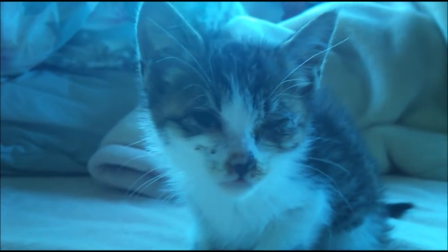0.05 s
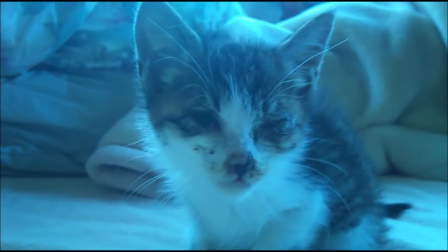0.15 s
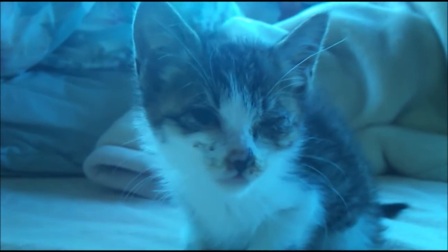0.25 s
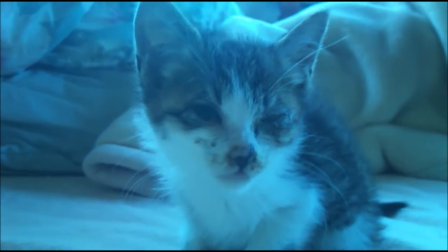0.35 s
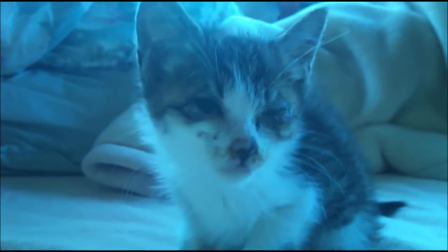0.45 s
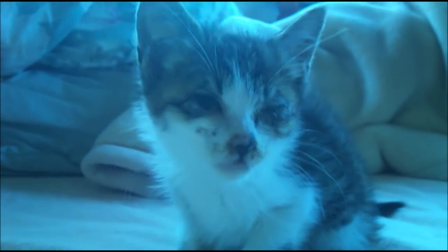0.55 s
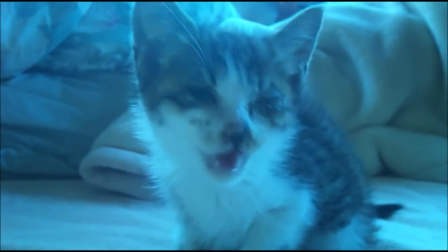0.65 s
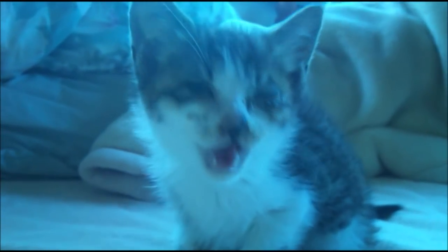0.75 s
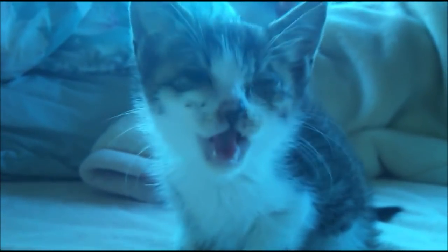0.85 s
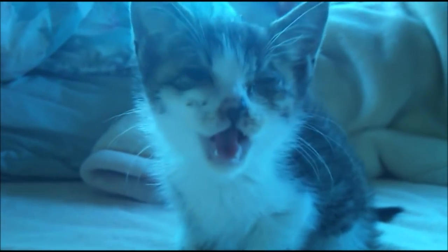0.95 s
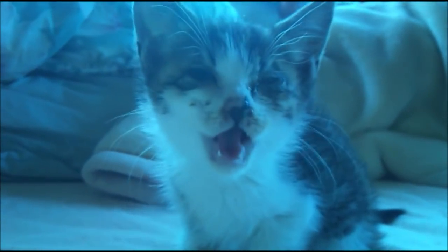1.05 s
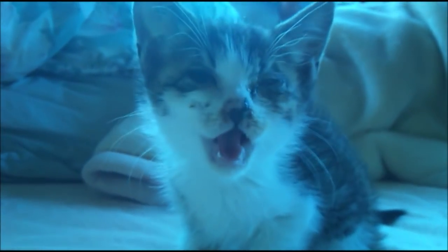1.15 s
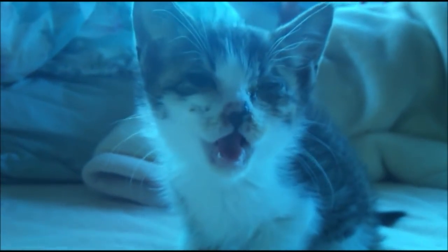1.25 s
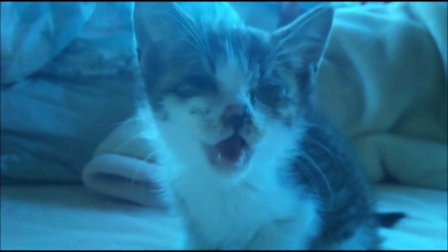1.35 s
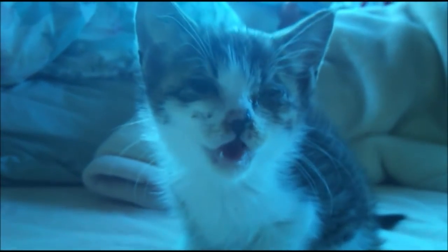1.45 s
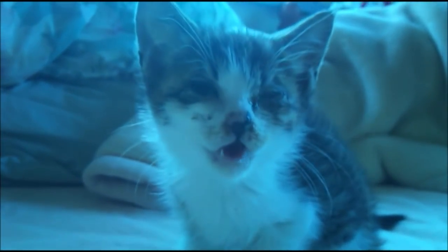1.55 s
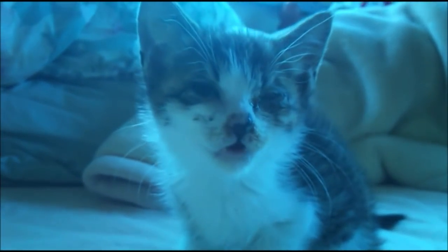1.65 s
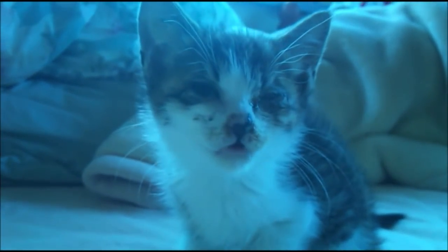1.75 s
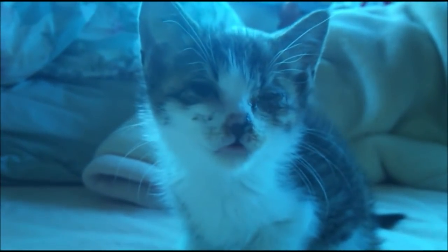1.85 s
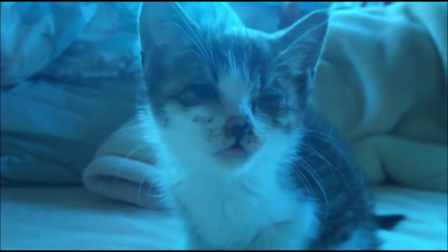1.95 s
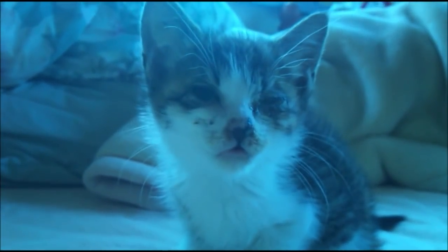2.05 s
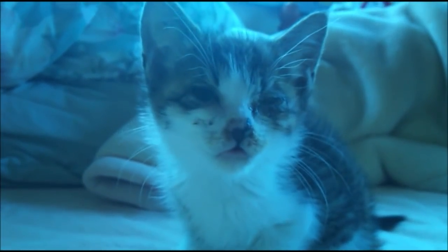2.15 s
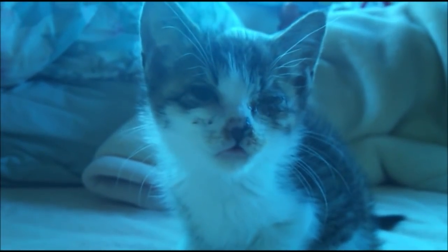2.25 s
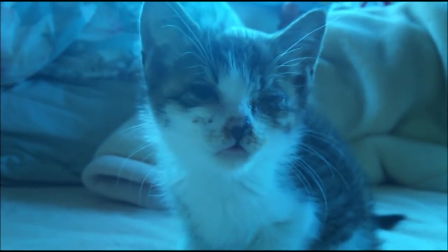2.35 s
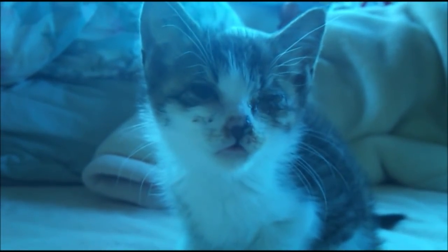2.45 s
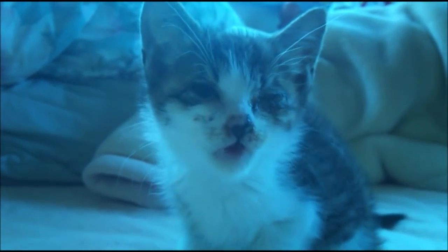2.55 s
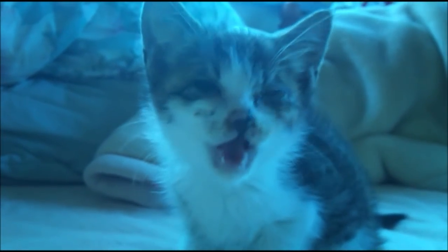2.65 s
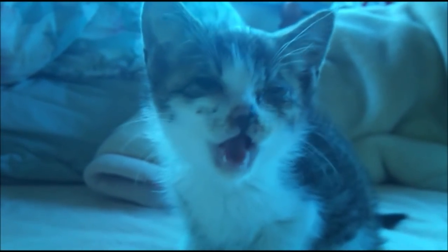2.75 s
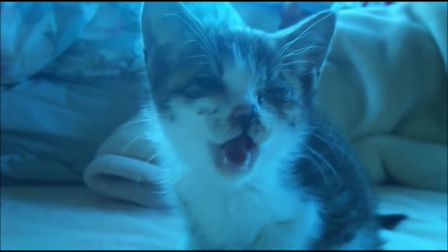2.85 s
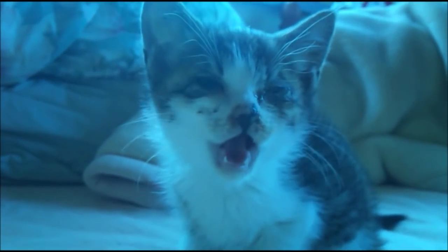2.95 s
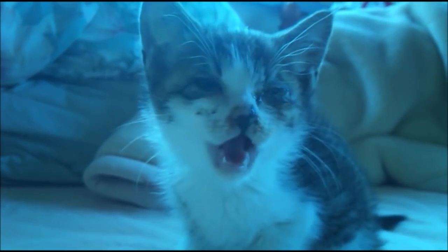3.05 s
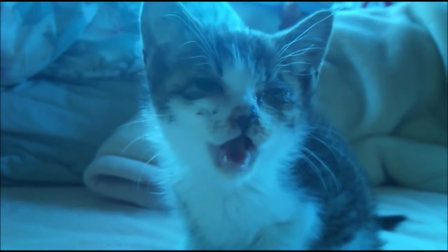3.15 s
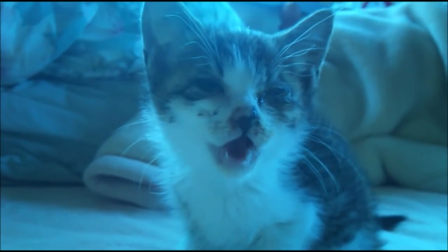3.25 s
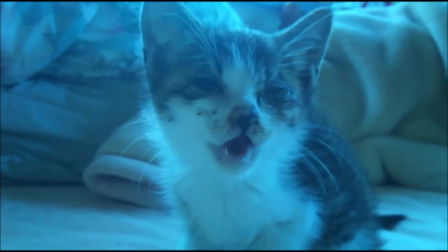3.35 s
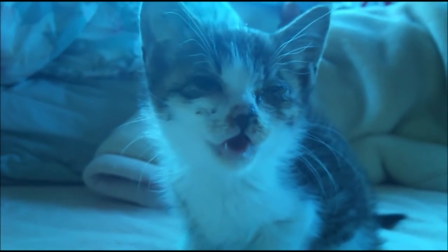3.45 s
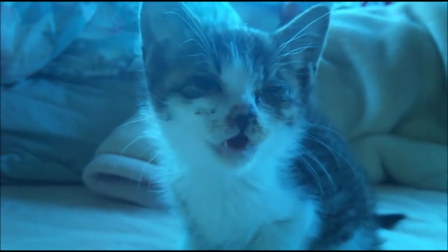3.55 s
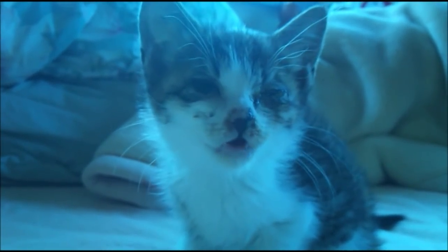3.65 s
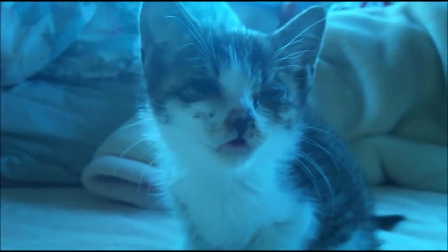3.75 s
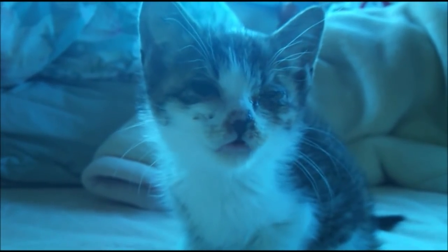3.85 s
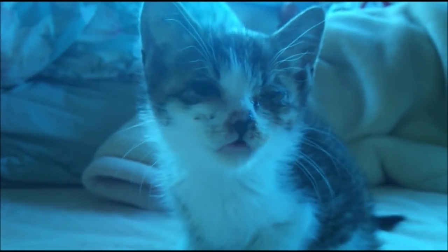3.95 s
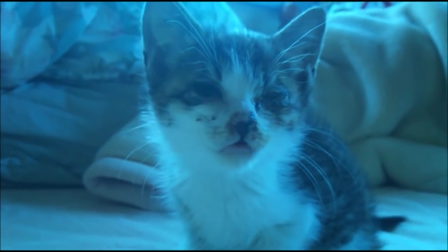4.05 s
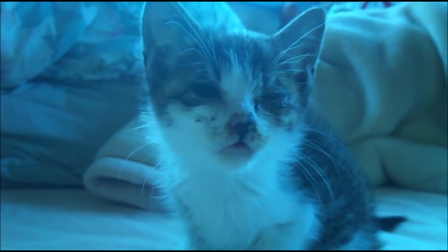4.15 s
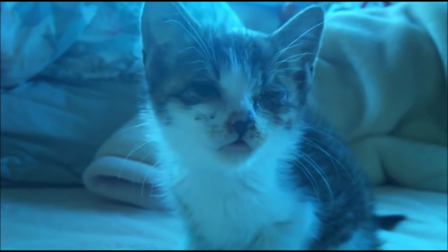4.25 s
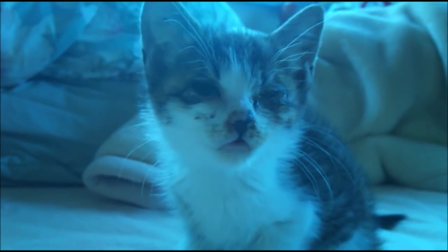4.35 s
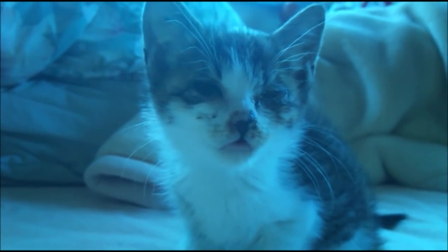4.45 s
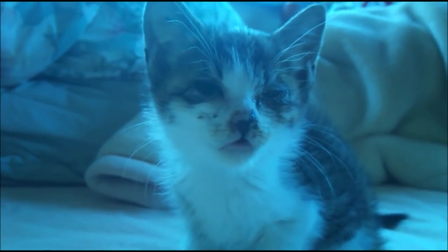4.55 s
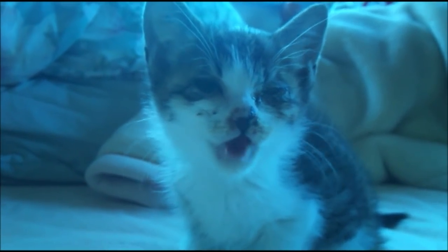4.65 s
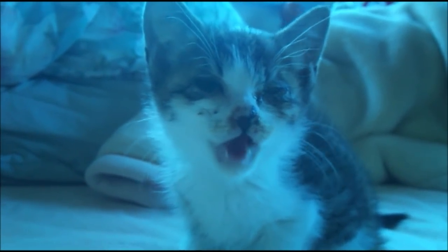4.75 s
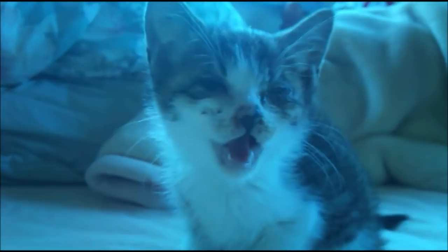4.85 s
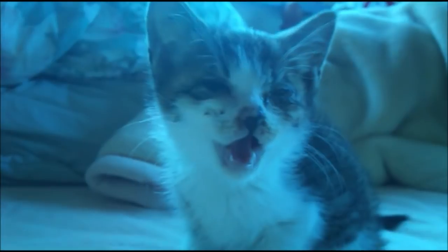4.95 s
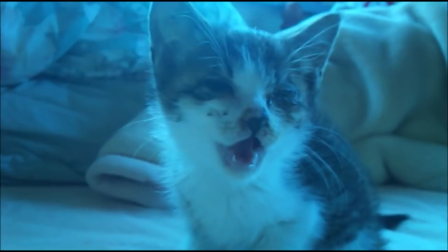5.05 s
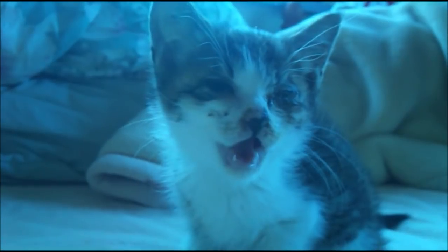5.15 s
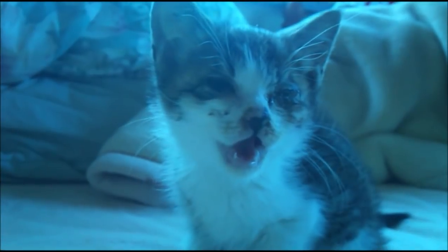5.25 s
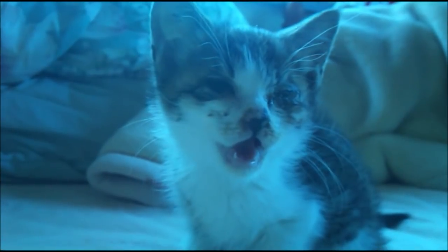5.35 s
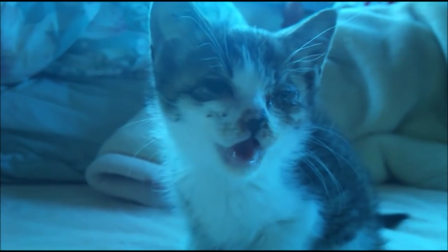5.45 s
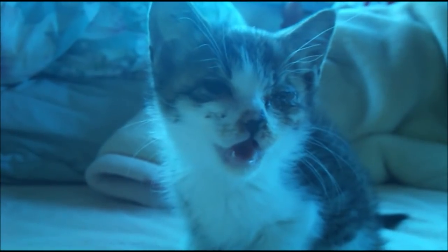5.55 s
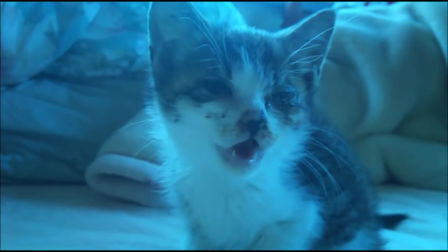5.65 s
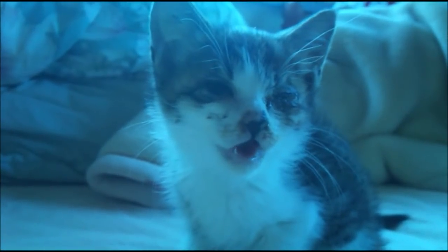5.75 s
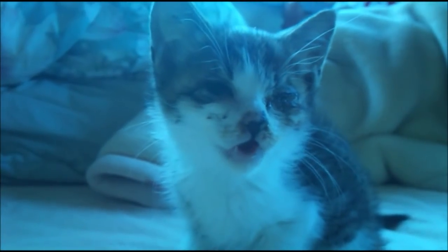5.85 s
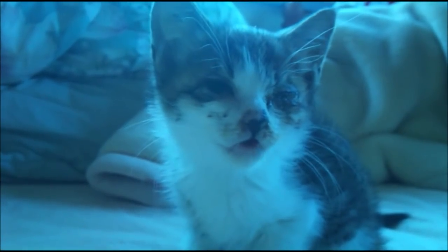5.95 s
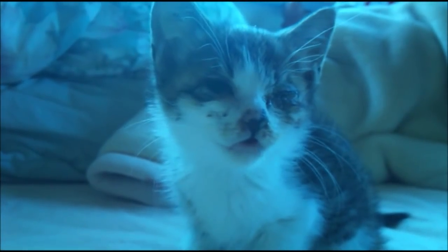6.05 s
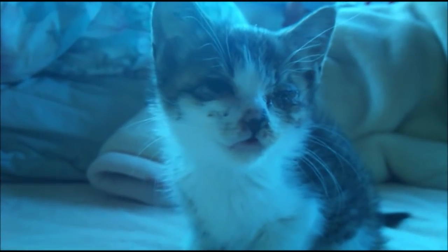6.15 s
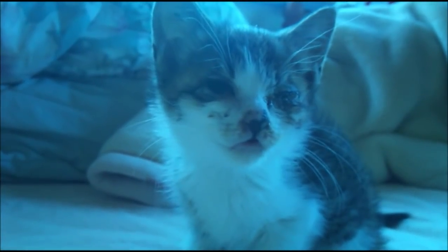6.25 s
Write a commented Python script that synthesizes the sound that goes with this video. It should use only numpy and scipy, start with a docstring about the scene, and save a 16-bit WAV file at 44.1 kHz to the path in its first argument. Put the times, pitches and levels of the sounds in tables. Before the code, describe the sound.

A tiny kitten on a bed gives three drawn-out, high, plaintive meows, recorded close with a slightly dull top end and a light room tail. The first swells gently, the second is strongest, the third softer, longer and a little raspy near its end. Every one closes with a cracking upward squeak and a small wet lip sound. Soft bedding taps appear in the second half, over very faint hiss.

```python
"""Over a faint steady hiss and low hum, a very young kitten meows three times, close by on a bed in a soft room.
Source and filter: vocal fold harmonics glide up, brighten as the mouth opens and dull as it shuts.
As each meow ends, period doubling adds half lines between the harmonics and the pitch turns up to a squeak.
Faint lip ticks and puffs, bursts of noise, follow the calls; soft taps, damped modes, come from the
second half of the scene on. Diffuse reflections tail the kitten and the taps."""
import sys
import numpy as np
from scipy import signal
from scipy.fft import rfft, irfft
from scipy.io import wavfile
from scipy.ndimage import uniform_filter1d

SR = 44100
rng = np.random.default_rng(int(sys.argv[2]) if len(sys.argv) > 2 else 0)


def bounce(signal):
    """Save signal as a 16-bit WAV file at the path given by the first command-line argument."""
    frames = np.transpose(np.atleast_2d(signal))
    limited = np.clip(frames, -1, 1)
    pcm = np.round(limited * 32767).astype(np.int16)
    wavfile.write(sys.argv[1], SR, pcm)


N = 277389
TIME = np.arange(N) / SR


def from_db(db):
    """Level to amplitude: 20 dB is a factor of ten."""
    return 10 ** (np.asarray(db) / 20)


def rms_one(x):
    """Normalisation to unit rms, the square root of mean power."""
    return x / np.sqrt(np.mean(x ** 2) + 1e-20)


def curves(rows, t):
    """Linear interpolation of each table column at times t."""
    times, *columns = np.transpose(rows)
    return [np.interp(t, times, column) for column in columns]


def drift(rate, size):
    """Low-passed chance: white noise through two equal poles at rate Hz, scaled to unit rms."""
    pole = np.exp(-2 * np.pi * rate / SR)
    settling = SR // 10
    white = rng.standard_normal(size + settling)
    return rms_one(signal.lfilter([1], [1, -2 * pole, pole * pole], white)[-size:])


def noise(spectrum):
    """Spectral shaping: white noise weighted by a colour curve over log frequency, at unit rms."""
    hz, db = np.transpose(spectrum)
    bins = np.maximum(np.arange(N // 2 + 1) * SR / N, 1)
    gains = from_db(np.interp(np.log(bins), np.log(hz), db))
    return rms_one(irfft(rfft(rng.standard_normal(N)) * gains, N))


# colour of the background hiss: (frequency [Hz], relative level [dB])
HISS_COLOUR = [(20, -3.5), (50, -3.5), (90, -3.5), (150, -2.5), (250, -3), (400, -4.5), (900, -9.5),
               (2300, -12), (4900, -15.5), (6700, -13), (7400, -23.5), (9000, -55)]


def background_hiss(level_db=-72.5):
    """Stationary noise: a constant spectrum at a constant rms level."""
    return from_db(level_db) * noise(HISS_COLOUR)


def low_hum(hz=41.8, peak_db=-81, phase_spread=0.46, drift_rate=0.82):
    """Phase modulation: a low sine whose phase (rad) wanders slowly."""
    return from_db(peak_db) * np.sin(2 * np.pi * hz * TIME + phase_spread * drift(drift_rate, N))


# vocal fold rate of each meow before the break: (time [s], pitch [Hz])
PITCH = [
    [(0.81, 526), (0.83, 513.7), (0.888, 552), (0.964, 566), (1.06, 562.2), (1.086, 554), (1.342, 554.8),
     (1.46, 568), (1.506, 554.7), (1.604, 544.6), (1.63, 547)],
    [(2.75, 423), (2.756, 427), (2.77, 464.5), (2.796, 466.5), (2.838, 526.3), (2.9, 544), (3.05, 542),
     (3.138, 544.2), (3.244, 544), (3.308, 556), (3.532, 535.7), (3.7, 567)],
    [(4.83, 475), (4.85, 512), (4.88, 502.7), (4.976, 540.2), (5.016, 537.4), (5.064, 564), (5.15, 562.6),
     (5.312, 574.6), (5.348, 562.7), (5.498, 558.8), (5.604, 546.6), (5.86, 559.8)],
]
SQUEAK_HZ = 904   # pitch the broken voice heads for


def fold_rate(number, past, t, squeak_s):
    """Register break: the fold rate follows a logistic step from the held pitch towards the squeak."""
    held_hz, = curves(PITCH[number], t)
    broken = (1 + np.tanh(past / (2 * squeak_s))) / 2
    return held_hz + (SQUEAK_HZ - held_hz) * broken


# effort of each meow: (time [s], level [dB])
EFFORT = [
    [(0.82, -50.5), (0.888, -43.5), (1.008, -40), (1.65, -50.5), (1.7, -51)],
    [(2.765, -40.5), (2.805, -38.5), (2.819, -40.5), (2.877, -35), (2.955, -34), (2.999, -37),
     (3.163, -37.5), (3.337, -45), (3.599, -50.5), (3.647, -48.5), (3.687, -54), (3.719, -50),
     (3.755, -54.5)],
    [(4.84, -50.5), (4.92, -44.5), (5.118, -44.5), (5.48, -48), (5.706, -50), (5.92, -52)],
]


def loudness(number, past, t, start, end, squeak_s, fade_s, attack_s=.028, squeak_fade_db_per_s=141):
    """Amplitude envelope: effort in dB, exponential decay from the break, linear ramps at both ends."""
    effort_db, = curves(EFFORT[number], t)
    level_db = effort_db - squeak_fade_db_per_s * np.maximum(past + squeak_s, 0)
    ramps = np.minimum((t - start) / attack_s, (end - t) / fade_s)
    return from_db(level_db) * np.clip(ramps, 0, 1)


# the jaw in each meow: (wait [s], opening [s], held wide [s], sinking to half open [s], narrowing [s])
JAW = [(0.03, 0.077, 0.32, 0.25, 0.17), (0.073, 0.046, 0.34, 0.25, 0.19), (0.038, 0.12, 0.23, 0.22, 0.35)]
# mouth shapes: (brightness [dB per octave], four throat resonances [Hz])
# one row a meow for the first shape and the widest
AJAR = [(-4.5, 1170, 2830, 3530, 4700), (-1.5, 1160, 3170, 3520, 4620), (-4, 1180, 2950, 3580, 4480)]
WIDE = [(0.22, 1264, 3027, 3474, 4710), (4.3, 880, 2715, 3237, 4060), (1.54, 967, 2940, 3280, 4580)]
# one shape each, common to all the meows, in the same columns
HALF_OPEN = (-3, 1327.5, 2895, 3490, 4598)
NARROW = (-4.5, 1122.5, 2952, 3479.5, 4204)
SHUT = (-19, 1280, 3295, 3686, 4598)


def mouth_shape(number, t, start, breaks, shut_lead_s=0.071, shut_lag_s=0.036):
    """Articulation: jaw movement shifts the resonances and spectral tilt; shutting straddles the break."""
    shutting = breaks - shut_lead_s
    jaw_times = np.minimum(start + np.cumsum(JAW[number]), shutting)
    times = [*jaw_times, shutting, breaks + shut_lag_s]
    ajar, wide = AJAR[number], WIDE[number]
    shapes = [ajar, wide, wide, HALF_OPEN, NARROW, NARROW, SHUT]
    return curves(np.column_stack([times, shapes]), t)


# brief catches in the throat: (time [s], half length [s], added roughness [0-1])
CATCHES = [(1.094, .02, 0.03), (1.396, 0.021, .11), (2.821, .01, 0.1), (2.968, .022, 0.01),
           (5.719, 0.018, 0.26), (5.801, 0.032, 0.31)]


def hoarseness(t, start, breaks, settle_s, held_rough, break_rough, onset_rough=.75, break_rough_s=0.044):
    """Irregular phonation: rough at onset, decaying to a held value, catching, rough again at the break."""
    onset = onset_rough * np.exp(-(t - start) / settle_s)
    ending = break_rough * np.exp(-(np.minimum(t - breaks, 0) / break_rough_s) ** 2)
    catches = sum(depth * np.exp(-((t - s) / half) ** 2) for s, half, depth in CATCHES)
    return np.clip(held_rough + onset + ending + catches, 0, 1)


def period_doubling(past, strength, fade_s, lead_s=0.067, growth_s=0.035, lag_s=0.0076):
    """Subharmonic bifurcation: alternate cycles differ exponentially more in a short span about the break."""
    span = np.clip(np.minimum(past + lead_s, lag_s - past) / fade_s, 0, 1)
    return strength * np.exp(past / growth_s) * span


def resonance(hz, centre, width):
    """Second-order resonance: complex response of one throat mode."""
    return 1 / (1 - (hz / centre) ** 2 + 1j * hz * width / centre ** 2)


def bell(hz, centre, width, db):
    """Pole-zero pair: complex response of a broad peak or dip of db at its centre."""
    detune = 1j * (hz ** 2 - centre ** 2) / (hz * width)
    height = from_db(db / 2)
    return (detune + height) / (detune + 1 / height)


# widths of the four throat resonances: (width [Hz])
THROAT_WIDTHS_HZ = [244, 160, 270, 260]
# fixed peaks and dips of the head and nose: (frequency [Hz], width [Hz], level [dB])
HEAD = [(1920, 850, 9.1), (2980, 1080, -18), (5370, 1560, 15.6), (6200, 500, 8), (7150, 1000, 39)]
NOSE_HZ, NOSE_WIDTH_HZ, NOSE_DB = 2333, 500, -18.5   # dip at its deepest


def vocal_tract(hz, brightness, centres, shut_tilt=-5):
    """Linear filtering: throat resonances, head and nose multiply the strength of each line."""
    response = 1
    for centre, width in zip(centres, THROAT_WIDTHS_HZ):
        response = response * resonance(hz, centre, width)
    for centre, width, db in HEAD:
        response = response * bell(hz, centre, width, db)
    # a dull voice means a nearly shut mouth, so the nasal dip deepens; full at shut_tilt dB per octave
    nasality = np.clip(brightness / shut_tilt, 0, 1)
    return response * bell(hz, NOSE_HZ, NOSE_WIDTH_HZ, NOSE_DB * nasality)


def line_flutter(f0, octaves, t, steady_db=0.12, glide_db=0.61, brisk_glide=0.34):
    """Random amplitude modulation: it deepens with line number and with the speed of pitch glides."""
    log_pitch_speed = abs(np.gradient(np.log(f0), t))
    gliding = np.tanh(uniform_filter1d(log_pitch_speed, size=SR // 20) / brisk_glide)
    depth_db = (steady_db + glide_db * gliding) * (1 + octaves)
    return from_db(depth_db * np.array([drift(28, len(t)) for _ in octaves]))


# colour of irregular fold beats in the throat: (frequency [Hz], relative level [dB])
RASP = [(400, -30.5), (800, -16), (1050, -4.5), (1400, 13.5), (1800, -10.5), (2400, -35), (8000, -59.5)]


def throat_rasp():
    """Aperiodic excitation: coloured noise stands for irregular beats of the folds."""
    return noise(RASP)


# colour of air through the mouth: (frequency [Hz], relative level [dB])
AIR = [(300, -30.5), (800, -37.5), (1200, -7), (2200, -20), (3000, -2), (3600, 9), (4500, -9), (6000, -18),
       (8000, -36.5)]


def mouth_air():
    """Turbulence: a jet of air makes broadband noise, here coloured by the mouth."""
    return noise(AIR)


# the meows: (start [s], length before the closing fade [s], break after start [s],
# time constant of the squeak glide [s], settling time constant of the onset [s],
# held roughness [0-1], roughness added at the break [0-1], half-line strength factor at the break)
MEOWS = [(0.792, .92, .917, 0.014, 0.03, 0.05, 0.54, 2.5),
         (2.737, 1.052, 1.03, 0.0095, 0.031, 0.08, 0.53, 0.72),
         (4.809, 1.174, 1.127, 0.00905, 0.027, 0.07, 0.47, 2.8)]


def meow(number, air, rasp, waver=.0025, jitter=0.038, shimmer=0.078, air_db=-14.5, rasp_db=-6.0,
         half_tilt_db=-0.45, lowest_db=-15, fade_s=0.0045, count=28):
    """Source-filter theory: fold harmonics and half lines pass the moving throat, with pulsed turbulence."""
    start, length, break_after, squeak_s, settle_s, held_rough, break_rough, half_strength = MEOWS[number]
    breaks, end = start + break_after, start + length + fade_s
    on = (TIME > start) & (TIME < end)
    t = TIME[on]
    past = t - breaks
    f0 = fold_rate(number, past, t, squeak_s)
    envelope = loudness(number, past, t, start, end, squeak_s, fade_s)
    brightness, *centres = mouth_shape(number, t, start, breaks)
    rough = hoarseness(t, start, breaks, settle_s, held_rough, break_rough)
    doubling = period_doubling(past, half_strength, fade_s)
    # the folds waver slowly, and faster when hoarse
    unsteady = 1 + waver * drift(38, len(t)) + jitter * rough * drift(160, len(t))
    phase = 2 * np.pi * np.cumsum(f0 * unsteady) / SR
    # whole multiples are harmonics, the others half lines
    multiples = np.arange(1, count + 1)[:, None] / 2
    hz = multiples * f0
    octaves = np.log2(np.maximum(multiples, 1))
    half_line_db = half_tilt_db * (octaves - 6.0) + lowest_db * (multiples < 1)
    strengths = np.where(multiples % 1 == 0, 1, doubling * from_db(half_line_db))
    lines = from_db(brightness * octaves) * strengths * vocal_tract(hz, brightness, centres)
    lines = lines * line_flutter(f0, octaves, t)
    line_rms = np.sqrt((abs(lines) ** 2).sum(axis=0) / 2)
    voice = np.real(lines * np.exp(1j * multiples * phase)).sum(axis=0) / line_rms
    voice = voice * (1 + shimmer * rough * drift(180, len(t)))
    # turbulence escapes once a cycle; squared roughness keeps the rasp to the hoarsest moments
    breath = from_db(air_db) * rough * air[on]
    beats = from_db(rasp_db) * rough ** 2 * rasp[on]
    turbulence = (breath + beats) * (1 + np.cos(phase))
    out = np.zeros(N)
    out[on] = (voice + turbulence) * envelope
    return out


def dying(s, t60):
    """Exponential decay: an envelope that starts at s and falls 60 dB in t60."""
    return (TIME >= s) * np.exp(-np.log(1000) * np.clip((TIME - s) / t60, 0, 10))


# lip ticks and little puffs as the mouth shuts: (time [s], level [dB], 60 dB decay time [s])
LIPS = [(1.74, -64, 0.017), (1.771, -70, 0.24), (3.805, -64.5, 0.13), (5.987, -56, 0.014),
        (5.997, -66, 0.19)]


def lips(air):
    """Transient turbulence: decaying bursts of air as the lips meet."""
    return air * sum(from_db(db) * dying(s, t60) for s, db, t60 in LIPS)


# soft taps on the bedding: (time [s], level [dB])
TAPS = [(4.105, -61.5), (4.732, -50), (5.244, -55)]
# modes of each tap: (frequency [Hz], relative level [dB], 60 dB decay time [s])
TAP_MODES = [(587, -9, 0.044), (940, 3.5, 0.014), (1420, -7.5, 0.051), (1675, -14, 0.03)]


def taps():
    """Modal synthesis: each tap is a sum of heavily damped sines."""
    out = np.zeros(N)
    for s, db in TAPS:
        for hz, mode_db, t60 in TAP_MODES:
            ringing = np.sin(2 * np.pi * hz * (TIME - s))
            out += from_db(db + mode_db) * dying(s, t60) * ringing
    return out


def bedroom(x, t60=0.73, wet_db=-17, wall_hz=3500, first_s=0.01):
    """Diffuse reverberation: convolution with dulled, decaying noise as reflections off bedding and walls."""
    t = TIME[:SR // 2]
    tail = rng.standard_normal(len(t)) * (t > first_s) * np.exp(-np.log(1000) * t / t60)
    tail = signal.sosfilt(signal.butter(1, wall_hz, fs=SR, output="sos"), tail)
    in_band = np.sqrt(np.sum(tail ** 2) * SR / (2 * wall_hz))
    return x + from_db(wet_db) * signal.fftconvolve(x, tail / in_band)[:N]


def scene():
    """Superposition: the kitten and taps in their room add to the faint hiss and low hum."""
    background = background_hiss() + low_hum()
    air, rasp = mouth_air(), throat_rasp()
    kitten = sum(meow(number, air, rasp) for number in range(len(MEOWS))) + lips(air)
    return (bedroom(kitten + taps()) + background)[None]


def record(dry, cutoff_hz=7500):
    """Band limiting: a steep elliptic low pass, 0.2 dB ripple and 70 dB rejection, cuts the top."""
    return signal.sosfilt(signal.ellip(10, .2, 70, cutoff_hz, fs=SR, output="sos"), dry)


dry = scene()
out = record(dry)
bounce(out)
```